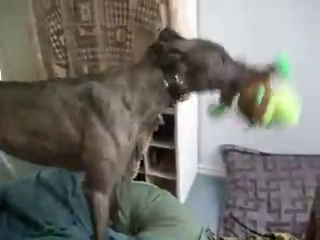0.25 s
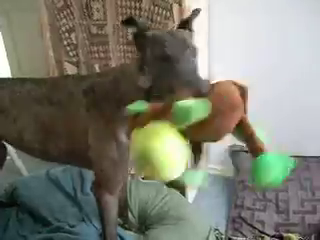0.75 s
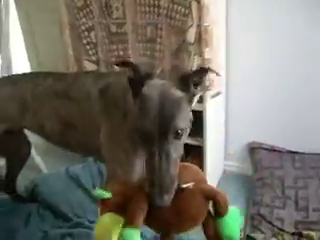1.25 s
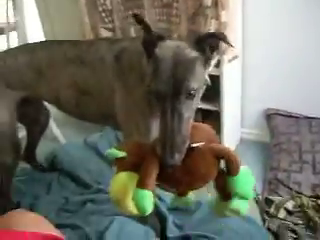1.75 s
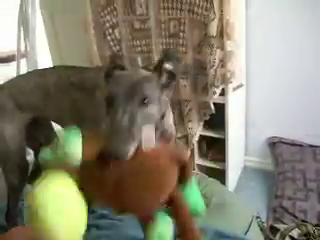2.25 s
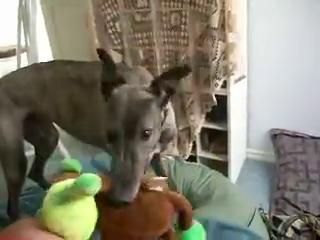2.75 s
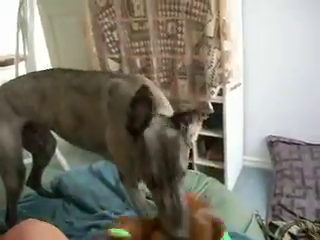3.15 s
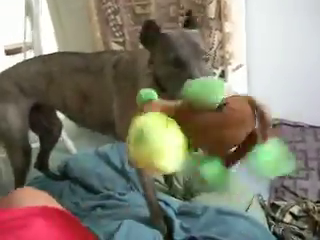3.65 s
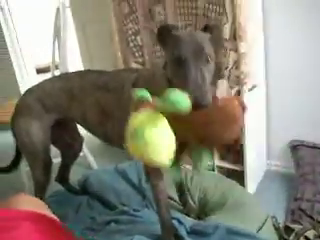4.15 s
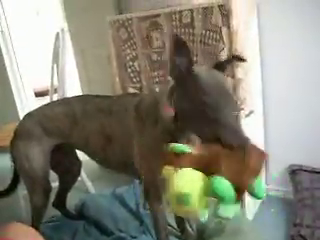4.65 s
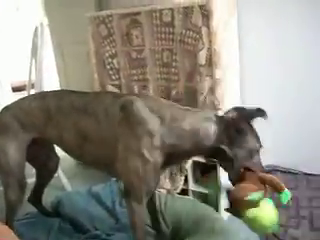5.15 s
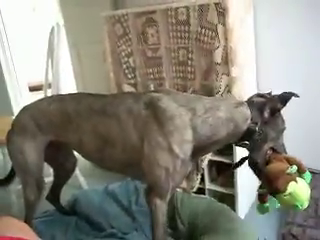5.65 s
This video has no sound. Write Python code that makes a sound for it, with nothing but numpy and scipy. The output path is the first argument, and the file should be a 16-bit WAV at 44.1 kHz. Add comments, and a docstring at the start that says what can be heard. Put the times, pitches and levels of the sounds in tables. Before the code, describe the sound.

In a small room with short, lively echoes, a dog chews a squeaky plush toy near a narrow-band microphone that overloads. A rubbing swish opens, and a shrill squeak snaps at 0.1 s, followed by cleaner ones at 0.5 and 0.7 and a higher, harsher one at 1.0, trailed by a breathy snuffle. After a gap, squeaks return at 1.8, 2.1, 2.45, 2.8, 3.15 and 3.6 s, mostly piercing double chirps: up with the squeeze, a tiny pause, down on release. Low stuffing thumps underlie several around 1.8 to 2.8. Air puffs through the muzzle near 2.0, 3.0, 3.5 and 4.0. A lower, duller squeak comes at 4.05, a sharp double at 4.65, a last shorter squeak at 5.0. Small tooth and mouth clicks dot the gaps, notably at 2.6, 3.3 and just before 5.0. Faint plush rustles and ticks end by 5.3, leaving steady rumble, hiss and hum.

```python
"""A dog chewing a squeaky plush toy

Each bite drives air through the squeaker's reed: its pitch glides up with the squeeze and falls as the jaw
lets go. Damped modes make the clicks of teeth and tongue, shaped noise the snuffles and the swishing plush,
and low pulses the thumps of the stuffing. A small room answers with wall echoes and a diffuse tail over
rumble and hum; a narrow-band microphone overloads on loud sound and cuts off the highest crests."""
import sys
import numpy as np
from scipy import signal
from scipy.fft import rfft, irfft, next_fast_len
from scipy.io import wavfile
from scipy.ndimage import uniform_filter1d, map_coordinates

SR = 44100
rng = np.random.default_rng(int(sys.argv[2]) if len(sys.argv) > 2 else 0)


def wav_out(sig):
    """Save sig, one row per channel (or a flat mono array), as 16-bit PCM at SR to the path in sys.argv[1]."""
    wavfile.write(sys.argv[1], SR, np.round(np.clip(np.atleast_2d(sig).T, -1, 1) * 32767).astype(np.int16))


N = 259749  # length in samples

# bites on the squeaker: onset t/s, squeeze length t/s, jaw lets go after t/s, release length t/s,
# top pitch f/Hz, squeeze level/dB, release level/dB, overtone level/dB (levels before the reed's swing)
BITE_STROKES = [ (0.106, .012, 0.035, 0.02, 3800, -1, -6.5, -2.5),
                (0.478, 0.017, 0.033, .019, 3068, -5.5, -4.5, -1.5),
                (0.712, .022, .031, .021, 3101, -2, -3, -4),
                (1.009, 0.016, 0.037, .024, 4400, 0.5, -1.5, -5),
                (1.823, 0.029, .034, 0.026, 3078, -1, -5, -3), (2.085, 0.017, .040, 0.022, 4805, 2, -3, -5),
                (2.448, 0.022, .040, .017, 4700, -0.5, -3.5, -4),
                (2.802, 0.026, 0.056, .018, 4300, 0, -7, -5.5),
                (3.158, .025, 0.07, 0.018, 4127, -1.5, -9.5, -5),
                (3.587, .026, .076, .015, 3910, 0, -9.5, -3), (4.05, .021, .028, .021, 1902, -3, -1, -4.5),
                (4.656, 0.024, .078, .016, 3700, -1.5, -12, -3),
                (5.019, .016, .024, .019, 2650, -3, -5.5, -4.5)]
SHUT_HZ = 3350  # a bite with a top pitch above this presses the reed shut between its strokes


def amp(db):
    """Level law: decibels to amplitude gain."""
    return 10 ** (np.asarray(db) / 20)


def unit(x):
    """Power normalisation: scaled to rms 1."""
    return x / np.sqrt(np.mean(x ** 2) + 1e-20)


def along(points, hz):
    """Logarithmic frequency scale: (f/Hz, value) points interpolated on it."""
    f, v = np.transpose(points)
    return np.interp(np.log(hz + 1), np.log(f + 1), v)


def filtered(x, response):
    """Linear filtering: the spectrum of x times a response of frequency."""
    size = next_fast_len(N + SR // 2)
    hz = np.fft.rfftfreq(size, 1 / SR)
    return irfft(rfft(x, size) * response(hz), size)[:N]


def noise(spectrum):
    """Spectral shaping: white noise coloured by (f/Hz, level/dB) points, rms 1."""
    white = rng.standard_normal(N)
    return unit(filtered(white, lambda hz: amp(along(spectrum, hz))))


def wobble(rate, count=N):
    """Band-limited fluctuation: a smooth random curve of count samples, rate knots a second."""
    knots = rng.standard_normal(int(count * rate / SR) + 4)
    return map_coordinates(knots, [np.arange(count) * rate / SR])


def gate(age, length, edge):
    """Time window: open from age 0 to length, with linear flanks edge seconds wide."""
    return np.clip(np.minimum(age, length - age) / edge + .5, 0, 1)


def background(floor_db=-39.5):
    """Stationary noise: steady rumble and hiss, with the pure tones of mains hum."""
    # spectrum of rumble and hiss: f/Hz, relative density level/dB
    floor_spectrum = [(12, -31.5), (20, -3.5), (55, -1), (86, -4), (114, -4), (178, -6.5), (265, -11),
                      (352, -12), (563, -16.5), (1250, -22.5), (5000, -29), (6000, -28.5), (7000, -50.5)]
    # mains hum: f/Hz, rms level/dB
    hum_tones = [(120, -61.5), (240, -53)]
    t = np.arange(N) / SR
    hum = sum(np.sqrt(2) * amp(db) * np.sin(2 * np.pi * hz * t) for hz, db in hum_tones)
    return amp(floor_db) * noise(floor_spectrum) + hum


def swishes(edge=0.031, grain_db=4):
    """Friction noise: the swung toy's plush rubs on the dog's coat with a grainy level."""
    # rubs: onset t/s, length t/s, level/dB
    rubs = [(-0.03, 0.14, -36), (4.922, 0.1, -41.5), (5.154, 0.124, -46.5)]
    # spectrum of the rubbed fur: f/Hz, relative density level/dB
    fur_spectrum = [(290, -39), (500, -21), (815, -16), (886, -19), (1220, 0.5), (1760, -17), (2640, -12.5),
                    (4080, -17), (6000, -17.5), (7800, -69), (13200, -120)]
    t = np.arange(N) / SR
    rub = sum(amp(db) * gate(t - s, length, edge) for s, length, db in rubs)
    return rub * noise(fur_spectrum) * amp(grain_db * wobble(49))


def snuffles(edge=0.024, flutter_db=2.5, fade_db=5):
    """Turbulent flow: air puffs through the muzzle and dies down; a low nasal rush joins a little later."""
    # puffs into the fur: onset t/s, length t/s, level/dB, level of nasal rush re puff/dB
    puffs = [(0.934, 0.273, -31, -6), (2.036, 0.22, -27.5, -6), (3.042, 0.23, -30.5, -8),
             (3.542, 0.073, -34.5, -9.5), (3.991, 0.242, -32.5, -7)]
    # spectrum of the muzzle: f/Hz, relative level/dB
    muzzle_spectrum = [(300, -14), (700, -10.5), (1150, -1), (1600, -6.5), (2100, -8), (2850, -9.5),
                       (3500, -20), (5500, -26.5)]
    # spectrum of the nose: f/Hz, relative level/dB
    nose_spectrum = [(150, -22), (250, 3.5), (380, 4.5), (480, -1), (600, -23), (900, -42)]
    muzzle, nose = np.zeros((2, N))
    for s, length, db, nose_db in puffs:
        age = np.arange(N) / SR - s
        fading_db = db - fade_db * np.clip(age / length, 0, 1) ** 2
        muzzle += amp(fading_db) * gate(age, length, edge)
        nose += amp(db + nose_db) * gate(age - 0.12 * length, 0.83 * length, 3 * edge)
    air = muzzle * noise(muzzle_spectrum) + nose * noise(nose_spectrum)
    return air * amp(flutter_db * wobble(140))


def thumps(rise=0.0032):
    """Volume displacement: crushed stuffing springs back, one low push and pull of air."""
    # hard bites on the stuffing: onset t/s, nominal pulse level/dB
    crushes = [(0.734, -35), (1.844, -17.5), (2.124, -22), (2.453, -15.5), (2.813, -16.5), (4.641, -24)]
    out = np.zeros(N + SR)
    u = np.arange(SR // 8) / SR / rise  # age in rise times
    pulse = 2 * u * (1 - u / 2) * np.exp(1 - u)
    for s, db in crushes:
        out[round(s * SR):][:len(u)] += amp(db) * pulse
    return out[:N]


def clicks(scrape=0.46, upper=1.68, upper_db=-5, lower=0.575, lower_db=-10):
    """Impact excitation: three damped modes of the mouth or of tooth on plastic, with a little wet noise."""
    # clicks of teeth and tongue: onset t/s, level before decay/dB, ring f/Hz, decay by 60 dB t/s
    contacts = [(0.267, -11, 1058, .018), (0.632, -20.5, 1130, 0.019), (0.867, -21, 1110, 0.011),
                (2.589, -6.5, 1200, 0.0089), (2.984, -14.5, 1090, 0.0064), (3.3064, -1, 830, 0.0038),
                (3.560, -12, 4330, 0.0044), (3.725, -9.5, 650, 0.0055), (4.02, -17.5, 1226, 0.022),
                (4.637, -16.5, 947, 0.024), (4.782, -15, 920, 0.0075), (4.9769, 4.5, 4610, 0.0039),
                (5.209, -9, 750, 0.0027), (5.280, -23, 4200, .004), (5.297, -20.5, 4200, 0.0044)]
    rise_cycles = 0.37  # a soft contact: the ring builds up over this many cycles
    out = np.zeros(N + SR)
    t = np.arange(SR // 10) / SR
    for s, db, hz, t60 in contacts:
        shape = (1 - np.exp(-t * hz / rise_cycles)) * amp(db - 60 * t / t60)
        turns = 2 * np.pi * hz * t
        ring = np.sin(turns)
        ring += amp(upper_db) * np.sin(upper * turns)
        ring += amp(lower_db) * np.sin(lower * turns)
        out[round(s * SR):][:len(t)] += shape * (ring + scrape * rng.standard_normal(len(t)))
    return out[:N]


def glide(up, turn, down, top_hz):
    """Pressure-controlled pitch: up with the squeeze, then down, the more steeply the harder the bite."""
    start_hz, end_hz = 1204, 1080  # where the reed begins to speak and where it dies
    reopen_hz = 4706  # a reed that was pressed shut opens again at this pitch
    rise_bend, fall_bend = .9, 1.4  # curvature of the rise, and of the fall per unit of log pitch range
    fall_from_hz = reopen_hz if top_hz > SHUT_HZ else top_hz
    span = np.log(fall_from_hz / end_hz)
    rising = start_hz * (top_hz / start_hz) ** (up ** rise_bend)
    falling = end_hz * np.exp(span * (1 - down) ** (fall_bend * span))
    return uniform_filter1d((1 - turn) * rising + turn * falling, size=60)


def reed(pitch, overtone_db, rough):
    """Self-excited reed: it beats unevenly and sticks at tube resonances; gives its tone and its swing."""
    # the reed swings less at low pitch and chokes towards the top: pitch f/Hz, swing level/dB
    swing_levels = [(1000, -21.5), (1300, -9), (1700, -6.5), (2400, -3.5), (3100, -2), (3700, -4.5),
                    (4800, -3)]
    # the tube colours the overtones: f/Hz, level/dB
    tube_colour = [(2000, -4), (3000, -2), (3700, 0.5), (4300, 2.5), (4850, 6), (5300, 6), (6000, 0.5)]
    # tube resonances that catch and hold the reed: f/Hz, reach f/Hz
    tube_locks = [(1560, 150), (3060, 400)]
    flutter, rasp = .043, 0.35  # unsteadiness of pitch (share) and of single cycles (radians), if fully rough
    surge_db, overtone_surge_db = 2, 5  # each partial swells and sinks on its own
    overtone_fall_db = 2.5  # loss per higher overtone
    lock_calm, lock_overtone_db = 0.77, -2.5  # held by a resonance, the tone turns steadier and purer

    count = len(pitch)
    pitch = pitch * (1 + rough * flutter * wobble(600, count))
    grips = [np.exp(-((pitch - hz) / reach) ** 2) for hz, reach in tube_locks]
    pitch = pitch - sum((pitch - hz) * grip for (hz, _), grip in zip(tube_locks, grips))
    held = sum(grips)
    loose = rough * (1 - lock_calm * held)
    phase = 2 * np.pi * np.cumsum(pitch) / SR + rasp * loose * wobble(1500, count)
    tone = amp(surge_db * loose * wobble(400, count)) * np.sin(phase)
    for k in range(2, 6):
        db = overtone_db + along(tube_colour, k * pitch)
        db += lock_overtone_db * held - overtone_fall_db * (k - 2)
        gain = amp(db + overtone_surge_db * wobble(400, count)) * (k * pitch < 6500)
        tone += gain * np.sin(k * phase)
    return tone, amp(along(swing_levels, pitch))


def squeaker():
    """Flow-driven reed: a bite blows it and the release draws air back; a hard bite shuts it in between."""
    squeeze_swell_db, release_swell_db = -0.4, -4.5  # change of level over a stroke
    release_overtone_db = -1  # air drawn back in sounds duller
    edge_s, leak_s = 0.0028, 0.0068  # flanks of the tone, and of the air that leaks around it
    attack_s, attack_db = 0.01, 5.5  # the reed needs this long to build up, from this far below
    rough_hz = 3295  # bites that top out below this pitch are cleaner, in proportion
    hiss_db = -16.5  # air hissing past the reed, before the roughness factor

    out = np.zeros(N)
    air = amp(hiss_db) * noise([(400, -15.5), (1400, -1.5), (5000, 8.0), (7000, -33)])
    age = np.arange(-SR // 50, SR // 8) / SR
    for s, squeeze, let_go, release, top_hz, squeeze_db, release_db, overtone_db in BITE_STROKES:
        on = round((s + age[0]) * SR) + np.arange(len(age))
        # progress, 0 to 1, of the squeeze, of the release and of the jaw's turning round
        up = np.clip(age / squeeze, 0, 1)
        down = np.clip((age - let_go) / release, 0, 1)
        turn = np.clip((age - squeeze) / max(let_go - squeeze, 1 / SR), 0, 1)

        db = (1 - turn) * (squeeze_db + squeeze_swell_db * (up - .5))
        db += turn * (release_db + release_swell_db * (down - .5))
        db -= attack_db * (1 - np.clip(age / attack_s, 0, 1))

        if top_hz > SHUT_HZ:
            strokes = [(0, squeeze), (let_go, release)]
        else:
            strokes = [(0.00049, let_go + release)]
        speaks = sum(gate(age - start, length, edge_s) for start, length in strokes)
        leaks = sum(gate(age - start, length, leak_s) for start, length in strokes)

        rough = min(top_hz / rough_hz, 1)
        pitch = glide(up, turn, down, top_hz)
        tone, swing = reed(pitch, overtone_db + release_overtone_db * turn, rough)
        out[on] += amp(db) * swing * (speaks * tone + leaks * rough * air[on])
    return out


def room_response(tail_db=-11, build=0.0049, drift=.06):
    """Early reflections and reverberation: wall delays shift as the dog moves; a diffuse tail decays."""
    # first wall echoes: nominal delay t/s, level/dB
    wall_echoes = [(.0052, -7.5), (.0083, -12), (.0125, -34), (.019, -38), (0.0274, -19.5)]
    # reverberation time: f/Hz, decay by 60 dB t/s
    decay_times = [(200, 0.6), (1300, 0.41), (3200, 0.39), (5500, 0.45)]
    # colour of the tail: f/Hz, relative level/dB
    tail_colour = [(200, 11), (1300, 6.5), (2000, 2), (2600, 3.5), (3000, 1.5), (3400, 2.5), (5000, -3)]
    hz, t, z = signal.stft(rng.standard_normal(SR // 2), SR, nperseg=256)
    decay = amp(along(tail_colour, hz)[:, None] - 60 * t / along(decay_times, hz)[:, None])
    tail = signal.istft(z * decay * (1 - np.exp(-t / build)), SR, nperseg=256)[1]
    tail *= amp(tail_db) / np.linalg.norm(tail)
    for delay, db in wall_echoes:
        shifted = delay * np.exp(drift * rng.standard_normal())
        tail[round(shifted * SR)] += amp(db)
    return tail


def room(x):
    """Convolution with an impulse response: the room answers each bite from a new position."""
    out = np.zeros(N + SR)
    cuts = [0] + [round((row[0] - .01) * SR) for row in BITE_STROKES[1:]] + [N]
    for a, b in zip(cuts, cuts[1:]):
        echo = signal.fftconvolve(x[a:b], room_response())
        out[a:a + len(echo)] += echo
    return out[:N]


def scene(mouth_room_db=-6):
    """Superposition: direct sound of toy and dog, the room's answer and the background."""
    squeaks = squeaker()
    mouth = clicks() + snuffles() + swishes()
    echoes = room(squeaks + amp(mouth_room_db) * mouth)
    return (squeaks + mouth + thumps() + echoes + background())[None]


def record(dry, ceiling=0.7, lopsided=0.017, knee=4, sag_db=-11, sag_hz=110, recover_hz=30,
           full_scale=0.62, crest_fall_db=6):
    """Nonlinear distortion: the microphone saturates unevenly, is band-limited, then its crests are cut."""
    # microphone's upper band edge: f/Hz, level/dB
    mic_response = [(4800, 0), (5300, -3.5), (5700, -15), (6000, -20.5), (6300, -45), (6700, -79)]
    top_hz = 16200  # nothing passes from here up
    x = dry[0]
    top = ceiling * (1 + lopsided * np.sign(x))
    held = x / (1 + np.abs(x / top) ** knee) ** (1 / knee)

    # overload drags the amplifier's bias down: a low thump under the loudest sounds
    def bias(hz):
        return amp(sag_db) / (1 + 1j * hz / sag_hz) * hz / (hz - 1j * recover_hz)

    sag = filtered(np.minimum(np.abs(x - held), .5), bias)
    narrow = filtered(held - sag, lambda hz: amp(along(mic_response, hz)))
    cut = np.clip(narrow, -full_scale, full_scale)
    # the treble made by the cut crests falls off above 8 kHz
    crest_fall = [(8000, 0), (top_hz, -crest_fall_db)]
    return filtered(cut, lambda hz: amp(along(crest_fall, hz)) * (hz < top_hz))[None]


dry = scene()
out = record(dry)
wav_out(out)
```